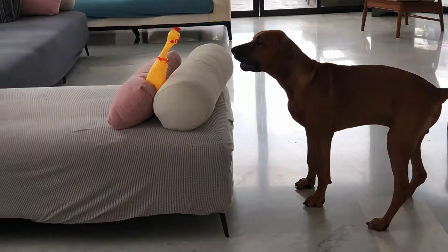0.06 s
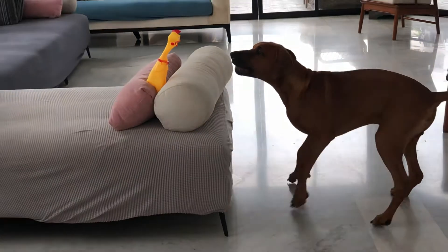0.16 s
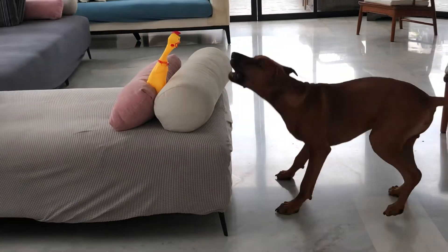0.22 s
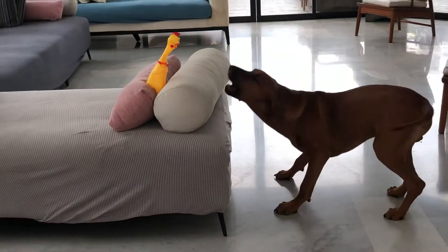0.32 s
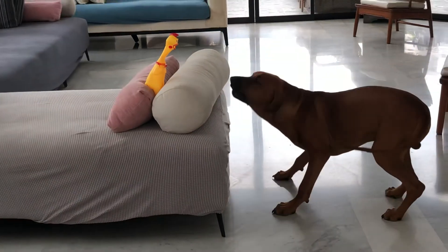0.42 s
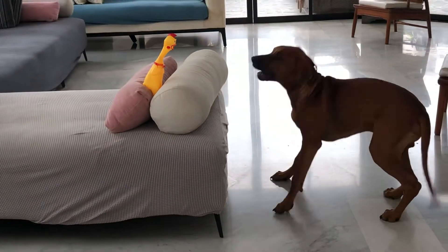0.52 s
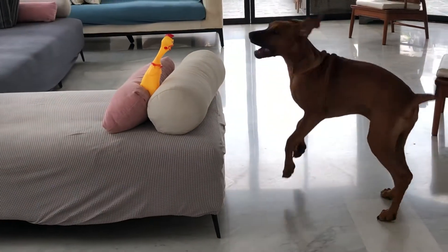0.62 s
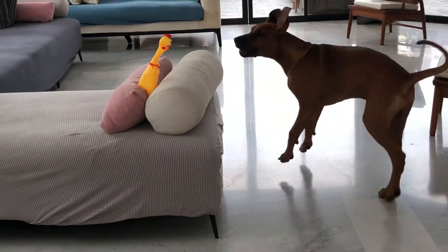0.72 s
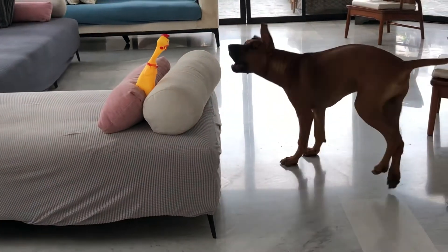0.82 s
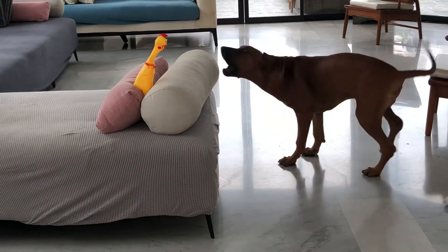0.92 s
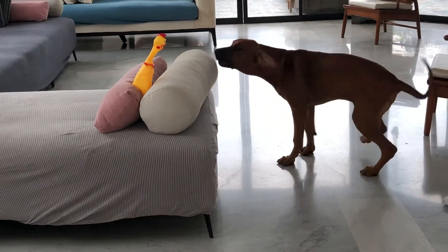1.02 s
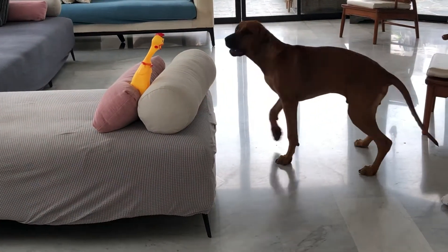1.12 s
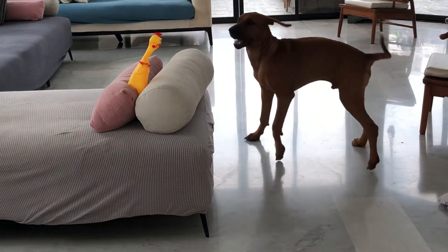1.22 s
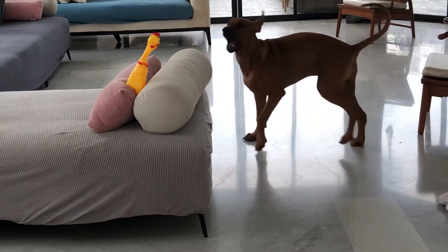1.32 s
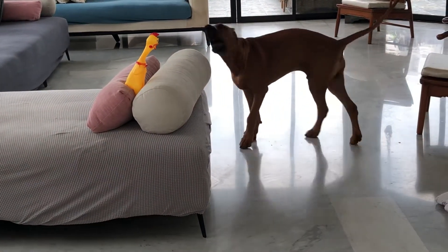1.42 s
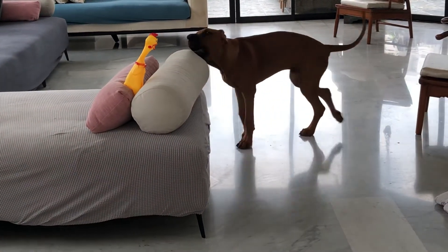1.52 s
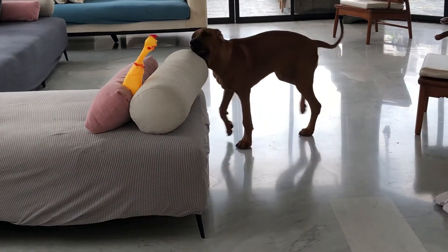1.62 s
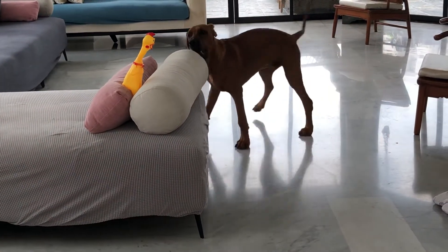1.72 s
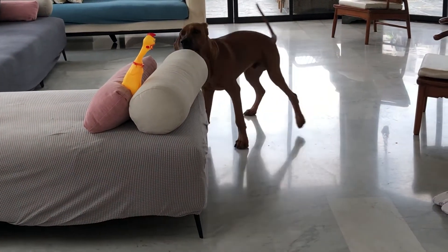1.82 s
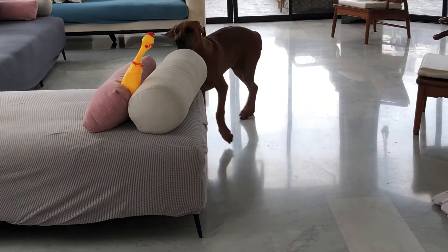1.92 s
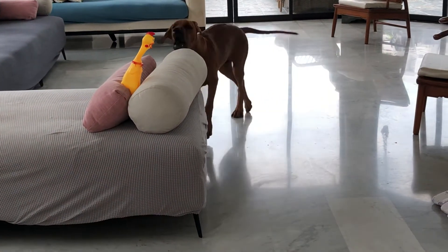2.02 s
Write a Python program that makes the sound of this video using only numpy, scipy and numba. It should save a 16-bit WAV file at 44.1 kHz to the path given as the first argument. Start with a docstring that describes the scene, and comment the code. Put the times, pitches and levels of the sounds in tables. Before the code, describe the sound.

A large dog barks three times, a couple of metres away in a quiet living room with a stone floor. Faint claw ticks and a gruff throat catch lead into the first bark at 0.2 seconds. Paws scuff around 0.6, then more barks follow at 0.85 and 1.4 seconds. Each is loud, rising and raspy, with soft dull thuds underneath. The room's echo fades out by about 2 seconds.

```python
"""A large dog barks three times, a couple of metres away in a living room with a stone floor.
A faint rumble fades as claws tick; a gruff catch in the throat leads into the first bark at 0.2 s.
Paws scuff, then two more barks follow at 0.85 s and 1.4 s. Each is a rising, roughening voice through
throat and mouth resonances, with a rasp of air on top and dull thuds as the dog lunges.
A limiter holds the peaks down, and the room rings on to the end."""
import sys
import numpy as np
from scipy import signal
from scipy.fft import rfft, irfft
from scipy.io import wavfile
from scipy.ndimage import uniform_filter1d, minimum_filter1d
from numba import njit

SR = 44100
rng = np.random.default_rng(int(sys.argv[2]) if len(sys.argv) > 2 else 0)


def bounce(signal):
    """Save signal as a 16-bit WAV file at the path given by the first command-line argument."""
    frames = np.transpose(np.atleast_2d(signal))
    limited = np.clip(frames, -1, 1)
    pcm = np.round(limited * 32767).astype(np.int16)
    wavfile.write(sys.argv[1], SR, pcm)


N = 90405
TIME_S = np.arange(N) / SR
LOG_FREQ = np.log(np.fft.rfftfreq(N, 1 / SR) + 1)


def undb(db):
    """Decibels to gain."""
    return 10 ** (np.asarray(db) / 20)


def unit(x):
    """Scale to rms 1."""
    return x / np.sqrt(np.mean(x ** 2) + 1e-18)


def noise(spectrum):
    """Noise of rms 1, shaped by (frequency [Hz], level [dB]) points."""
    hz, db = np.array(spectrum, float).T
    shape = undb(np.interp(LOG_FREQ, np.log(hz), db))
    return unit(irfft(rfft(rng.standard_normal(N)) * shape, N))


def wander(hz):
    """Random drift of rms 1, low-passed at hz."""
    return unit(signal.sosfilt(signal.butter(2, hz, fs=SR, output="sos"), rng.standard_normal(N)))


def ramp(start_s, length_s):
    """Linear rise from 0 to 1."""
    return np.clip((TIME_S - start_s) / length_s, 0, 1)


def swell(at_s, sigma_s, db):
    """Gaussian envelope."""
    return undb(db) * np.exp(-.5 * ((TIME_S - at_s) / sigma_s) ** 2)


@njit
def bandpass(x, hz, width_hz):
    """State-variable filter, gain 1 at its moving centre."""
    y, band_state, low_state = np.empty(len(x)), 0., 0.
    for i in range(len(x)):
        g, damping = np.tan(np.pi * hz[i] / SR), width_hz / hz[i]
        band = (band_state + g * (x[i] + 1e-18 - low_state)) / (1 + g * (g + damping))
        band_state = 2 * band - band_state
        low_state += 2 * g * band
        y[i] = damping * band
    return y


def resonance(x, hz, width_hz):
    """Two band-passes in series, each width_hz wide: steep skirts."""
    hz, width_hz = hz * np.ones(N), float(width_hz)
    return bandpass(bandpass(x, hz, width_hz), hz, width_hz)


# background spectra: (frequency [Hz], level [dB])
FLOOR_SPECTRUM = [(25, -16.5), (60, -6.5), (100, -12), (190, -1), (320, -7), (1200, -10.5), (2200, -27.5),
                  (5000, -33.5), (9000, -44), (16000, -54)]
RUMBLE_SPECTRUM = [(50, -19), (110, 1), (190, 3), (320, -30), (1200, -23.5), (2500, -28.5), (6000, -48),
                   (15000, -60)]

def background(floor_db=-46, rumble_db=-40.5, fade_s=0.21):
    """Steady noise floor and a low rumble that dies away."""
    floor = undb(floor_db) * noise(FLOOR_SPECTRUM)
    return floor + undb(rumble_db) * np.exp(-TIME_S / fade_s) * noise(RUMBLE_SPECTRUM)


# reverberation bands and standing waves: (frequency [Hz], t60 [s], level [dB])
ROOM_BANDS = [(120, 1, 7), (248, 0.96, 2), (370, 0.63, 4.5), (523, 0.72, 7), (760, .88, -3),
              (1390, 0.84, -2), (2380, 0.72, -2.5), (4370, 0.75, -1), (8700, 0.65, -7.5),
              (14700, 0.47, 3.5)]
ROOM_MODES = [(374, 2.2, 5.5), (416, 0.58, 3), (438, 1, 6), (512, 0.57, 7), (579.3, 0.41, 9),
              (717.4, 0.23, 1.5), (826, 0.94, 3.5), (832, 0.81, 3), (1140, 2, 10)]

def room(x, tail_db=-0.5, build_s=0.023, early_db=-4.5, early_s=0.023, echoes_per_s=900):
    """Direct sound, sparse early reflections, a dense tail that dulls, and standing waves."""
    band_hz, band_t60_s, band_db = np.array(ROOM_BANDS, float).T
    white = rfft(rng.standard_normal(N))
    tail = np.zeros(N)
    for weights, t60_s, db in zip(np.eye(len(band_hz)), band_t60_s, band_db):
        band = irfft(white * np.interp(LOG_FREQ, np.log(band_hz), weights), N)
        tail += undb(db) * band * undb(-60 * TIME_S / t60_s)
    tail *= 1 - np.exp(-TIME_S / build_s)
    early = rng.standard_normal(N) * (rng.random(N) < echoes_per_s / SR) * np.exp(-TIME_S / early_s)
    response = (undb(tail_db) * unit(tail) + undb(early_db) * unit(early)) / np.sqrt(N)
    for hz, t60_s, db in ROOM_MODES:
        rate = np.log(1000) / t60_s
        response += undb(db) * 2 * rate / SR * np.exp(-rate * TIME_S) * np.sin(2 * np.pi * hz * TIME_S)
    return x + signal.fftconvolve(x, response)[:N]


# lunges: (time [s], sigma [s], level [dB])
THUDS = [(.255, .008, -35), (.305, .008, -35), (.385, .012, -40), (.9, .035, -44), (1.485, .015, -46),
         (1.585, .018, -39)]
# thud spectrum: (frequency [Hz], level [dB])
THUD_SPECTRUM = [(25, -7), (90, 0), (170, -3), (400, -24), (1500, -60)]

def thuds():
    """Dull bursts of low noise as the dog lunges."""
    return sum(swell(*thud) for thud in THUDS) * noise(THUD_SPECTRUM)


# claw strikes: (time [s], level [dB])
TICKS = [(0.142, -51), (0.151, -41.5), (.157, -39.5), (0.828, -48.5)]
# pad slides: (time [s], sigma [s], level [dB])
SCUFFS = [(0.205, 0.026, -38.5), (0.531, 0.014, -66), (0.559, 0.015, -36.5), (0.605, 0.014, -32.5),
          (0.85, 0.027, -43)]
# claw and pad spectra: (frequency [Hz], level [dB])
TICK_SPECTRUM = [(1500, -24), (5000, 3), (8000, -7.5), (15000, -13)]
SCUFF_SPECTRUM = [(300, 3.5), (1600, 6), (3000, -14.5), (5000, -16), (9000, -19), (15000, -32.5)]

def paws(tick_s=0.0023):
    """Claws tick and pads slide on the stone."""
    ticks = sum(undb(db) * (TIME_S >= at_s) * np.exp(-abs(TIME_S - at_s) / tick_s) for at_s, db in TICKS)
    scuffs = sum(swell(*scuff) for scuff in SCUFFS)
    return ticks * noise(TICK_SPECTRUM) + scuffs * noise(SCUFF_SPECTRUM)


# throat catch: (time [s], sigma [s], level [dB])
CATCH = (.172, .004, -31)

def throat_catch():
    """A gruff puff of noise through one throat resonance."""
    return swell(*CATCH) * unit(resonance(rng.standard_normal(N), hz=690, width_hz=300))


# air between the teeth: (frequency [Hz], level [dB])
RASP_SPECTRUM = [(150, -48), (1500, -16), (2800, 0.5), (3400, 3), (4000, 2.5), (4400, -3.5), (5000, 1),
                 (5700, -2), (6300, 3), (7200, -1), (7900, -7.5), (10000, -5.5), (13000, -13.5),
                 (16000, -20)]

def rasp(rasp_db, hiss_hz, hiss_width_hz, hiss_db):
    """Turbulence at the teeth: broad noise plus a resonant hiss."""
    broad = undb(rasp_db) * noise(RASP_SPECTRUM)
    return broad + undb(hiss_db) * unit(resonance(rng.standard_normal(N), hiss_hz, hiss_width_hz))


# jaw closure, per formant: (gain change [dB])
CLOSING_DB = [9, 0, -11, -0.5, -24]

def vocal_tract(source, formants, shut, sag=0.023, band_hz=(200, 2450)):
    """Throat and mouth resonances; they sag and dull as the jaw shuts."""
    voiced = sum(undb(db + change_db * shut) * resonance(source, hz * (1 - sag * shut), width_hz)
                 for (hz, width_hz, db), change_db in zip(formants, CLOSING_DB))
    return signal.sosfilt(signal.butter(6, band_hz, "bandpass", fs=SR, output="sos"), voiced)


def vocal_folds(pitch_hz, rough, jitter=.085, shimmer=1.1, subharmonic=.45, wander_hz=160):
    """Pulses and breath, more ragged as rough grows. Returns the source and its airflow puffs."""
    pitch_hz = pitch_hz * (1 + jitter * rough * wander(wander_hz))
    phase = 2 * np.pi * np.cumsum(pitch_hz) / SR
    pulses = sum(np.cos(k * phase) for k in range(1, 13))
    pulses *= 1 + rough * (shimmer * wander(wander_hz) + subharmonic * np.cos(phase / 2))
    puffs = unit(1 + 0.51 * np.cos(phase))
    breath = rough * np.sqrt(rough * SR / pitch_hz) * puffs * rng.standard_normal(N)
    return pulses + breath, puffs


# voice contours: (time [s], pitch [Hz], level [dB])
VOICE_1 = [(.198, 250, -15), (.216, 280, -12), (.231, 335, -1), (.25, 372, 3), (.28, 396, 1),
           (.312, 378, 0), (.338, 426, 0), (.38, 428, -7)]
VOICE_2 = [(0.849, 225, -22.5), (0.861, 276.9, -5), (.875, 306, 12), (0.887, 361.5, 8.5),
           (0.903, 372.6, 0.5), (0.927, 409.5, -2.5), (0.963, 417.2, 5), (1.003, 420.5, 1),
           (1.05, 409.7, -11.5)]
VOICE_3 = [(1.424, 255.2, -16), (1.45, 293.2, -3), (1.472, 340.3, 1), (1.493, 374.6, -1),
           (1.513, 394.2, -3), (1.55, 395.6, -3), (1.578, 396.9, -4), (1.63, 394.3, -26.5)]
# resonances, jaw open: (frequency [Hz], width [Hz], gain [dB])
FORMANTS_1 = [(400.5, 170, -2.5), (719, 277, 5), (1210, 188, 4), (1900, 200, -7), (2260, 80, -8)]
FORMANTS_2 = [(513, 241, -5.5), (793, 225, 3.5), (1510, 240, 0), (2057, 157, -7.5), (2129, 156, -11)]
FORMANTS_3 = [(539, 325, -0.5), (735, 245, 5.5), (1393, 260, -1), (1946, 133, -7.5), (2136, 119, 0)]
# articulation, per bark: (voice break [s], closing start [s], closing length [s],
# rasp level [dB], hiss centre [Hz], hiss width [Hz], hiss level [dB])
ARTICULATION = [(0.258, 0.25, 0.089, -22, 4130, 900, -25), (.915, 0.963, 0.071, -25.5, 5290, 1650, -29.5),
                (1.498, 1.531, 0.027, -22.5, 4400, 2250, -26)]

def barks(level_db=-13, attack_s=0.0052, relax_s=0.0097, rasp_rise_s=0.03, rasp_closing_db=-3):
    """Fold pulses, clear then ragged, ring the throat; air rasps as the jaw opens, less as it shuts."""
    voices, throats = (VOICE_1, VOICE_2, VOICE_3), (FORMANTS_1, FORMANTS_2, FORMANTS_3)
    sound = np.zeros(N)
    for voice, formants, articulation in zip(voices, throats, ARTICULATION):
        break_s, closing_at_s, closing_s, *rasp_settings = articulation
        at_s, hz, db = np.array(voice, float).T
        gate = ramp(at_s[0] - attack_s / 2, attack_s) * (1 - ramp(at_s[-1], relax_s))
        effort = undb(np.interp(TIME_S, at_s, db)) * gate
        rough = .2 + .25 * ramp(break_s, length_s=.035)
        shut = ramp(closing_at_s, closing_s)
        source, puffs = vocal_folds(np.interp(TIME_S, at_s, hz), rough)
        airflow = effort * puffs * ramp(at_s[0], rasp_rise_s) ** 2 * undb(rasp_closing_db * shut)
        sound += vocal_tract(effort * source, formants, shut) + airflow * rasp(*rasp_settings)
    return undb(level_db) * sound


def scene():
    """Dry thuds and background; voice and paws through the room. Mono."""
    bed = thuds() + background()
    dog = barks() + throat_catch() + paws()
    return (bed + room(dog))[None]


@njit
def peak_hold(peaks, decay):
    """Envelope follower: instant attack, exponential release."""
    envelope, held = np.empty(len(peaks)), 0.
    for i in range(len(peaks)):
        held = max(peaks[i], held * decay)
        envelope[i] = held
    return envelope


def record(dry, ceiling=0.99, release_s=.07, lookahead_s=.003, top_hz=15900):
    """Look-ahead limiter, then a steep low-pass."""
    window = int(lookahead_s * SR)
    envelope = peak_hold(np.abs(dry[0]), np.exp(-1 / (release_s * SR)))
    gain = np.minimum(1, ceiling / (envelope + 1e-9))
    gain = uniform_filter1d(minimum_filter1d(gain, window), window)
    return signal.sosfilt(signal.ellip(10, .1, 80, top_hz, fs=SR, output="sos"), dry * gain)


dry = scene()
out = record(dry)
bounce(out)
```